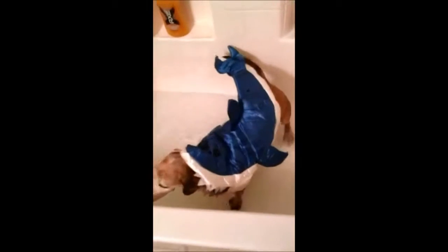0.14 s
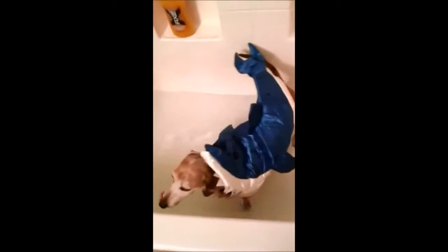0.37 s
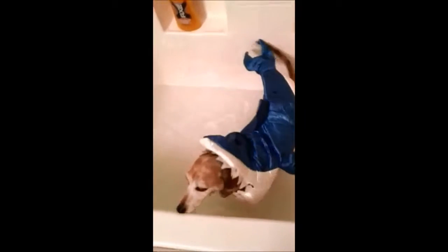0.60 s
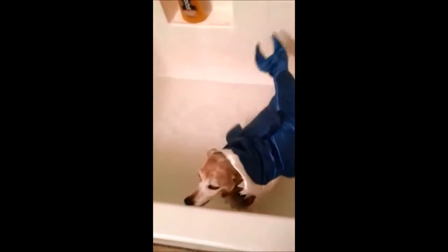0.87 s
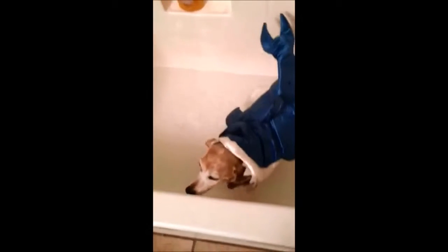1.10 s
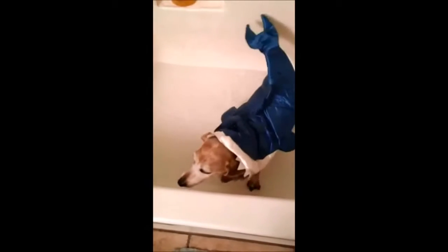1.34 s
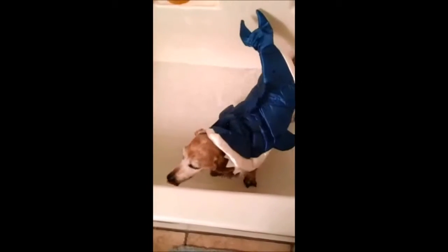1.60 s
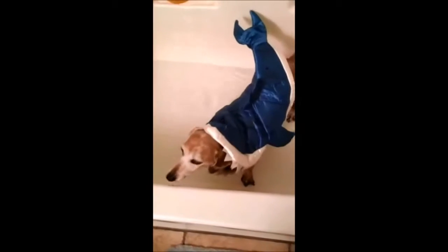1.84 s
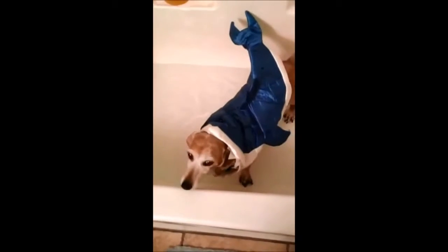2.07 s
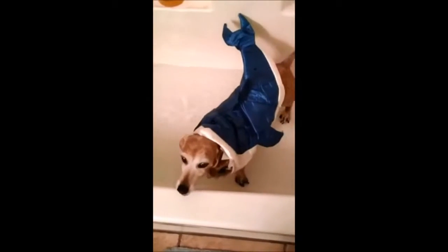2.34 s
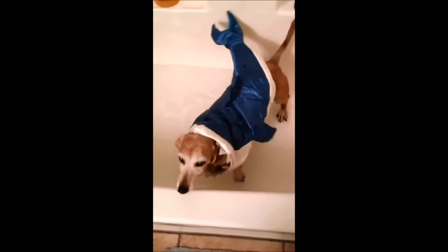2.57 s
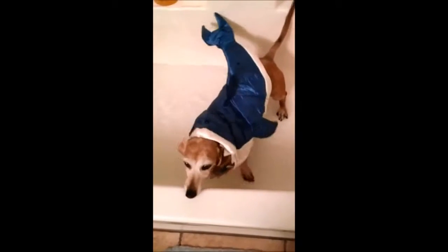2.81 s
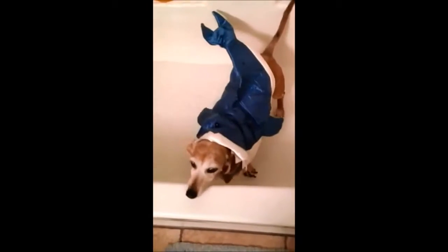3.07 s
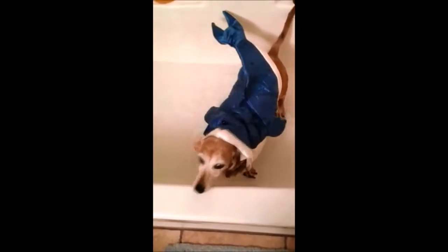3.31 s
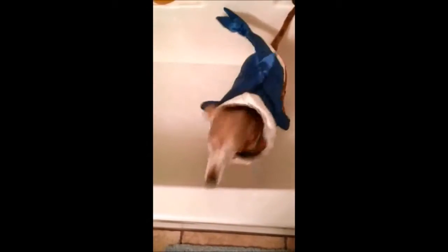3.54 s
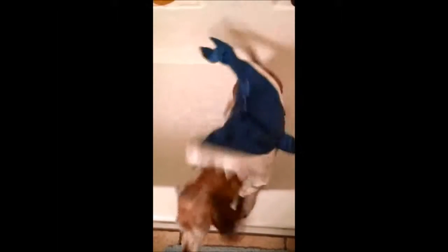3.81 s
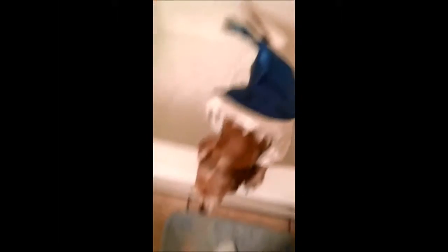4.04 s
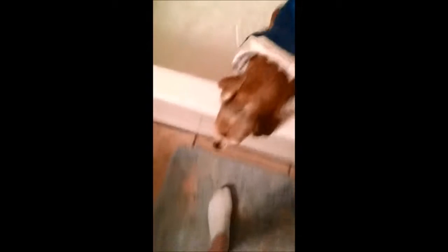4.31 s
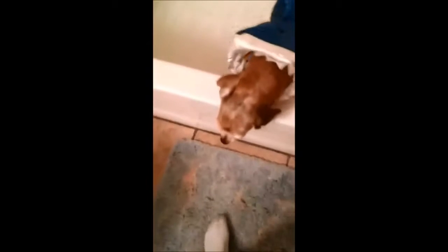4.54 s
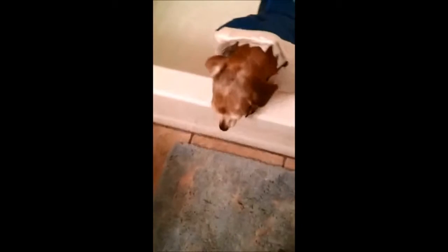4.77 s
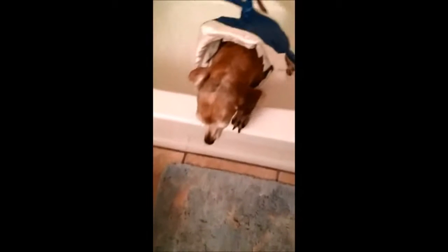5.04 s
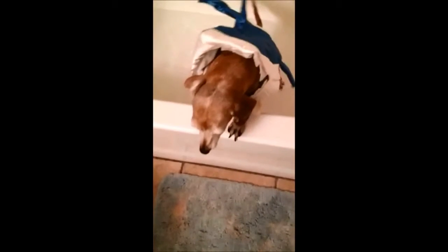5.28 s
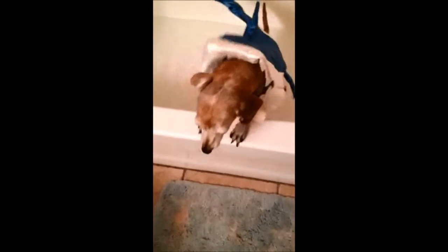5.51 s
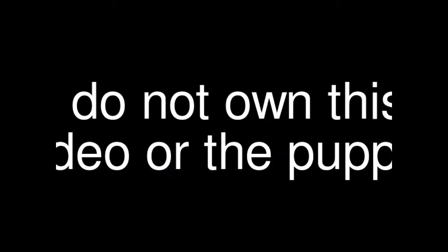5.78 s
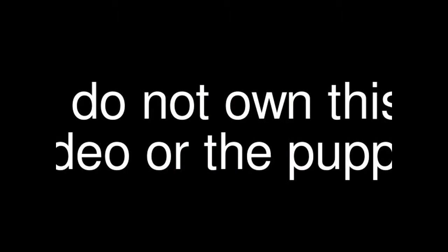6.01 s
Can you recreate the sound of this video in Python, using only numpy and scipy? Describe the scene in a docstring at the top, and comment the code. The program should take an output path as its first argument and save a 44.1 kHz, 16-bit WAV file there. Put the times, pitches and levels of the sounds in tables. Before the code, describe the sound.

In a small tiled bathroom, a dog paddles in a tub with a little water. Quick claw ticks and plinking bubbles come first, then dull thumps and short skids, a calmer stretch with faint sniffs, and a sudden very loud double clatter with a deep hollow boom and splash as it lunges for the rim. Light scratches and drips follow until the sound cuts dead. Close handheld microphone, thin bass.

```python
"""In a hard tiled bathroom, a small dog paddles and scrabbles in a tub holding a little water.
Claws and paws skid as bursts of tiny slips; the dog's weight thumps the ringing modes of the tub.
Trapped air plops as dying sines, water trickles as droplets over hiss, and the dog sniffs twice through
its resonant nose. The room spreads the sounds over a steady hush. All stops dead shortly before the end."""
import sys
import numpy as np
from scipy import signal
from scipy.fft import rfft, irfft
from scipy.io import wavfile

SR = 44100
rng = np.random.default_rng(int(sys.argv[2]) if len(sys.argv) > 2 else 0)


def dump(signal):
    """Clip the signal to [-1, 1] and save it as 16-bit WAV at the path in sys.argv[1]."""
    limited = np.clip(np.atleast_2d(signal).T, -1, 1)
    pcm = np.round(limited * 32767).astype(np.int16)
    wavfile.write(sys.argv[1], SR, pcm)


def elevation(decibels):
    """Turn decibel levels (scalar or array-like) into linear amplitude ratios."""
    levels = np.asarray(decibels, float)
    return 10 ** (levels / 20)


N = 270333   # length in samples

# Skids of claws and paws: t/s, level at 3.3 kHz/dB, then relative to it:
# level near 1.2 kHz/dB, level at 7 kHz/dB, level at 12 kHz/dB
SKIDS = [(0.2394, -48.5, -5, -4, -6), (0.2646, -35, -8, -20, -18), (0.2807, -37.5, 4, -7, -15),
         (0.3012, -32.5, 4, 1, -15), (0.318, -53, 3, -1, 6), (0.3458, -37.5, 4.5, 3, -12),
         (0.4931, -43.5, -4, -8, -7), (0.7246, -44.5, -10, -7, -13), (0.8938, -51.5, 6, 2.5, 0),
         (1.061, -30.5, -7, -3, -9), (1.067, -20.5, -2.5, -9, -10), (1.0711, -28.5, -3, 1.5, -6),
         (1.2541, -27, -5, -9, -16), (1.3008, -22, -1, -9.5, -17.5), (1.6407, -39.5, -11, 2.5, -7),
         (2.4475, -42.5, -2, -14, -18), (2.585, -42.5, -7, -1, -15), (2.6004, -41.5, -9, -1, -22),
         (2.617, -40.5, -20, -7, -18), (2.6532, -33, -11, 2.5, -9), (2.7401, -42, -15, 0, -11),
         (2.83, -56, 6, -1, 7), (2.8549, -28, -7, -12, -23), (2.8648, -38, 6, 7, -7.5),
         (3.1003, -54, -3, 0, -22), (3.1674, -39, -11, 1, -15), (3.1853, -33, -11.5, 4.5, -10),
         (3.236, -31, 1.5, -22, -15), (3.5074, -47, -4, -1, -14), (3.5562, -42.5, -5.5, -7.5, -6.5),
         (3.6047, -48, -2, -0.5, -1.5), (3.64, -34.5, -11, -15.5, -17), (3.743, -10.5, -3.5, -8, -3.5),
         (3.7509, -10.5, -1, -8, -2), (3.7772, -15, 1, 5, 1.5), (3.9125, -6.5, -6.5, 1, -3),
         (4.249, -51, -10, 4, -18), (4.285, -42.5, 7.5, -2, -7), (4.299, -34.5, -6, 4.5, -5.5),
         (4.4711, -38, -1.5, -12, -14), (4.5072, -36.5, 1, -14, -17), (4.5288, -40.5, 13, 5, -3),
         (4.5652, -42, 11, 5, -4), (4.6083, -43, 18.5, 2, -5), (4.708, -54, 10.5, 4, -2),
         (4.908, -41.5, -3, -7, -11), (5.0127, -49, -9, -2.5, -2.5), (5.3559, -32.5, -20.5, 3.5, -7),
         (5.3992, -34, -6.5, -11.5, -7), (5.664, -45.5, -2.5, -10, -13.5)]
# The dog's weight on the tub: t/s, boom of the floor/dB, knock of the sides/dB, knock of the rim/dB
THUMPS = [(0.308, -43.5, -55, -41.5), (0.349, -44, -72, -44), (0.812, -47.5, -51, -60),
          (0.906, -28.5, -35, -42.5), (0.935, -26, -46, -44), (1.31, -37.5, -44.5, -37.5),
          (2.148, -66, -48.5, -46.5), (2.252, -71, -72, -62), (2.392, -52, -53, -69),
          (2.495, -45.5, -47, -54), (2.659, -51, -47, -85), (2.861, -55, -65.5, -79),
          (3.246, -50, -51, -53), (3.526, -48, -49.5, -54.5), (3.598, -47, -54.5, -56.5),
          (3.755, -35.5, -36.5, -33), (3.913, -12, -28, -24), (3.957, -22, -37, -30.5),
          (4.079, -29.5, -49, -62), (4.308, -43.5, -48, -46.5), (4.399, -55, -44.5, -49.5),
          (4.532, -42, -56, -34.5), (4.598, -52, -48.5, -42), (5.169, -51.5, -66, -74),
          (5.402, -48, -51, -54), (5.432, -55, -52, -46)]
# Ways the tub shell rings (two of the floor, two of the sides, then the rim): f/Hz, level/dB, fall by 60 dB/s
TUB_MODES = [(124, -5.5, .15), (158.5, 0.5, 0.28), (234.2, -3.5, 0.17), (300.2, -2, 0.13),
             (376.6, -2.5, 0.11), (432, -1.5, 0.13), (550, -5.5, 0.058), (739, -11.5, 0.11),
             (850, -8.5, 0.077)]
# Air trapped by paws and drops, low plops to small plinks: t/s, starting level/dB, f/Hz, fall by 60 dB/s
BUBBLES = [(0.238, -36.5, 2440, 0.0076), (0.256, -38, 738, 0.023), (0.2655, -31, 2630, .007),
           (0.2796, -23.5, 6300, 0.0033), (0.282, -23, 820, 0.01), (0.296, -26, 6950, .005),
           (0.3015, -14.5, 2410, .005), (0.322, -22, 1450, 0.017), (0.3455, -19.5, 3230, .005),
           (0.343, -28, 6440, .005), (0.349, -34, 1570, .02), (0.386, -30, 2040, 0.0079),
           (0.434, -44, 1380, .02), (0.4925, -29, 2430, 0.0038), (0.508, -33.5, 2520, 0.0062),
           (0.669, -37.5, 9600, 0.0044), (1.325, -16.5, 584, 0.019), (1.344, -28.5, 688, 0.023),
           (1.68, -26, 1690, 0.0041), (1.686, -35.5, 1587, 0.04), (2.449, -23, 885, 0.025),
           (2.4616, -39, 4730, 0.0058), (2.475, -33.5, 1270, 0.017), (2.49, -40.5, 1470, 0.017),
           (2.609, -42, 1040, 0.042), (2.615, -29.5, 2760, 0.0074), (3.1381, -29, 4400, 0.0024),
           (3.234, -23, 1563, 0.011), (3.236, -24.5, 3450, 0.011), (3.5798, -34.5, 4420, 0.007),
           (3.6418, -33, 2800, 0.0073), (3.7473, 0.5, 2560, 0.0035), (3.8988, -4.5, 2200, 0.0033),
           (3.911, -1.5, 6960, 0.0034), (3.913, -5, 2160, 0.012), (3.9214, -10, 7300, .0035),
           (4.074, -26.5, 1615, 0.02), (4.29, -43, 662, 0.086), (4.3947, -36.5, 5040, .012),
           (4.4727, -17.5, 7000, 0.0016), (4.5076, -23.5, 3670, 0.007), (4.514, -27, 948, 0.033),
           (4.5294, -21, 4000, 0.007), (4.544, -29.5, 996, .022), (4.604, -24.5, 1190, 0.024),
           (4.608, -29, 1620, 0.023), (4.7092, -35, 5520, .009), (5.014, -33.5, 8200, .003),
           (5.1386, -38, 10340, 0.003), (5.1689, -39.5, 14700, .004), (5.44, -44, 840, 0.028),
           (5.6326, -28.5, 5610, .0015)]
# Restless water between splashes: t/s, trickle level/dB, push of the slosh on the shell/dB
RESTLESS_WATER = [(0.0, -73, -120), (0.3, -77, -100), (0.5, -63.5, -112), (0.95, -62.5, -100),
                  (1.3, -67, -108), (1.62, -68.5, -97), (1.95, -75.5, -112), (2.4, -72.5, -108),
                  (2.82, -66, -99.5), (3.15, -75, -108), (3.57, -70, -102), (3.8, -52, -97),
                  (4.14, -59.5, -108), (4.75, -62.5, -103), (5.12, -76.5, -130), (5.5, -67, -102)]
# Splashes thrown up by a paw: t/s, spray level/dB, push of the slosh/dB, time to swell/s
SPLASHES = [(0.26, -58, -97.5, 0.062), (1.07, -55, -90, 0.029), (2.48, -86, -96, 0.052),
            (2.62, -73, -98, 0.02), (3.65, -57, -93, 0.066), (3.905, -28.5, -73.5, 0.025),
            (4.3, -59, -100, 0.036), (4.53, -50, -88.5, 0.044)]
# Tone colour of the trickle: f/Hz, level per Hz/dB
TRICKLE_COLOUR = [(290, -44), (500, -3.5), (545, -10.5), (2980, -12), (5800, -13.5), (13100, -20),
                  (15300, -18), (16000, -30)]
# Resonances of the dog's nose: f/Hz, width/Hz, level/dB
NOSE = [(4730, 730, -1), (7760, 1000, 2), (9000, 600, -11), (10800, 600, -22)]
# Sniffs: t of the peak/s, level/dB
SNIFFS = [(2.187, -67), (2.456, -70)]
# How long the room's echo lasts: f/Hz, fall by 60 dB/s
ROOM_T60 = [(125, 1), (500, 0.46), (1800, 0.33), (5000, 0.33), (13000, 0.25)]
# Tone colour of the room's echo: f/Hz, relative level/dB
ROOM_COLOUR = [(125, -1.5), (500, 4), (1800, 0.38), (5000, -1.5), (13000, -2)]
# Tone colour of the steady hush: f/Hz, level per Hz/dB
HUSH_COLOUR = [(15, -60), (25, -27.5), (64, -17.5), (105, -3.5), (161, 4.5), (285, -10.5), (405, -5),
               (531, -14), (9840, -26.5), (14400, -35.5), (16000, -40.5)]


def rms_one(x):
    """Scale to an rms (average strength) of 1."""
    return x / np.sqrt(np.mean(x ** 2) + 1e-20)


def in_time(rows):
    """Draw straight lines between the rows of a time table, giving one value a sample for each column."""
    times, *columns = np.transpose(rows)
    return [np.interp(np.arange(N) / SR, times, column) for column in columns]


def at_hz(points, hz):
    """Read a frequency table on a logarithmic axis, as the ear hears pitch."""
    table_hz, values = np.transpose(points)
    return np.interp(np.log(np.maximum(hz, 1)), np.log(table_hz), values)


def coloured(x, points):
    """Filter a sound with a curve of (Hz, dB) points."""
    gain = elevation(at_hz(points, np.fft.rfftfreq(len(x), 1 / SR)))
    return irfft(rfft(x) * gain, len(x))


def ring(x, hz, t60):
    """A resonance: a unit click sets off a sine starting near height 1 and falling 60 dB in t60 seconds."""
    decay = elevation(-60 / (max(t60, 0.001) * SR))
    turn = 2 * np.pi * hz / SR
    return signal.lfilter([0, np.sin(turn)], [1, -2 * decay * np.cos(turn), decay ** 2], x + 1e-18)


def add(out, s, piece):
    """Mix a piece in, starting at s seconds."""
    at = round(s * SR)
    out[at:at + len(piece)] += piece[:N - at]


def grains(per_s, spread_db, size):
    """Scatter random clicks of uneven size and either sign."""
    sizes = elevation(spread_db * np.minimum(rng.exponential(1, size), 5)) * rng.choice([-1, 1], size)
    return sizes * (rng.random(size) < per_s / SR)


def swell(t, length):
    """Rise to 1 after a length of time, then die away."""
    u = np.maximum(t / max(length, 0.0003), 0)
    return u * np.exp(1 - u)


def skids():
    """Each skid is a dense burst of slips that swells and dies, in a colour of its own."""
    swell_s = 0.004
    slope_db = 3.5   # rise from 750 to 1500 Hz
    low_edge_db, top_edge_db = 21, 6.5   # falls towards 400 Hz and 16 kHz
    out = np.zeros(N)
    shape = swell(np.arange(4096) / SR, swell_s)
    for s, level_db, low_db, high_db, top_db in SKIDS:
        slips = rfft(grains(9000, 3.2, size=len(shape)) * shape)
        # Even out the spectrum: so many slips favour no pitch
        even = irfft(slips / np.sqrt(np.abs(slips) + 1e-9)) * shape ** 0.043
        burst = rms_one(even) * np.sqrt(np.mean(shape ** 2))
        colour = [(400, low_db - low_edge_db), (750, low_db - slope_db / 2), (1500, low_db + slope_db / 2),
                  (3300, 0), (7000, high_db), (12000, top_db), (16000, top_db - top_edge_db)]
        add(out, s - 0.6 * swell_s, elevation(level_db) * coloured(burst, colour))
    return out


def tub(push):
    """Paws and sloshing water ring the shell: the floor booms (row 0), the sides and rim knock (row 1)."""
    settle_s = 0.0063   # build-up time of the second floor mode
    hard_db = -29   # blows with a rim knock under this are gentle
    gentle_dull = 0.4   # share of that shortfall lost per octave in the high modes
    out, t = np.zeros((2, N)), np.arange(SR // 2) / SR
    uneven_db = rng.normal(0, 2.5, (len(THUMPS), len(TUB_MODES)))
    slosh = push * rng.standard_normal(N)
    for k, (hz, level_db, t60) in enumerate(TUB_MODES):
        row = out[int(k >= 2)]
        row += elevation(level_db) * ring(slosh, hz, t60)
        mode = elevation(level_db - 60 * t / t60) * np.sin(2 * np.pi * hz * t)
        build = 1 - np.exp(-t * hz / TUB_MODES[1][0] / settle_s)   # low modes build up more slowly
        octaves_up = max(np.log2(hz / TUB_MODES[5][0]), 0)
        for (s, boom_db, side_db, rim_db), own_db in zip(THUMPS, uneven_db[:, k]):
            if k < 2:
                part_db = boom_db
            else:
                part_db = own_db + (side_db if k < 4 else rim_db)
            part_db -= gentle_dull * max(hard_db - rim_db, 0) * octaves_up   # gentle blows are duller
            add(row, s, elevation(part_db) * build * mode)
    return out


def bubbles():
    """A pocket of air rings as a dying sine whose pitch creeps up as it surfaces."""
    rise = 0.05   # the pitch gains twice this share by the time the sine has fallen 60 dB
    out, t = np.zeros(N), np.arange(6000) / SR
    for s, level_db, hz, t60 in BUBBLES:
        cycles = hz * (t + rise * t ** 2 / t60)
        onset = 1 - np.exp(-t * hz / 1.2)   # builds up over about one cycle
        add(out, s, elevation(level_db - 60 * t / t60) * onset * np.sin(2 * np.pi * cycles))
    return out


def water():
    """Strength of the trickle and of the slosh: a restless ground plus the swell of each splash."""
    slosh_lag_s = 0.032   # the heavy water follows the spray
    t = np.arange(N) / SR
    spray, slosh = elevation(np.array(in_time(RESTLESS_WATER)))
    for s, spray_db, slosh_db, length in SPLASHES:
        spray = spray + elevation(spray_db) * swell(t - s, length) ** 2
        slosh = slosh + elevation(slosh_db) * swell(t - s - slosh_lag_s, length) ** 2
    return spray, slosh


def trickle(level):
    """Many tiny droplets, each ringing for a few cycles, over a fine hiss."""
    clicks = grains(1500, 0.97, size=N)
    dealt = rng.integers(0, 16, N)   # deals each click to one of 16 pitches
    drops = np.zeros(N)
    for k, hz in enumerate(np.geomspace(700, 14000, 16)):
        drops += ring(clicks * (dealt == k), hz, 12 / hz)
    drops = rms_one(coloured(drops, [(700, -11.5), (14000, 12.0)]))
    mixed = drops + elevation(-2) * rng.standard_normal(N)
    return level * rms_one(coloured(mixed, [(200, -37.5)] + TRICKLE_COLOUR))


def sniff():
    """Air hisses through the narrow resonances of the nose, each passed twice."""
    rise_db_per_s, fall_db_per_s = 386, 270
    air, t = rng.standard_normal(N), np.arange(N) / SR
    hiss, strength = np.zeros(N), np.zeros(N)
    for hz, width, level_db in NOSE:
        t60 = np.log(1000) / (np.pi * width)   # a narrow resonance rings longer
        hiss += elevation(level_db) * rms_one(ring(ring(air, hz, t60), hz, t60))
    for s, level_db in SNIFFS:
        strength += elevation(level_db + np.minimum(rise_db_per_s * (t - s), fall_db_per_s * (s - t)))
    return hiss * strength


def bathroom(x):
    """Dense reflections build up within milliseconds and die band by band."""
    echo_db, build_s = 2.5, 0.0014
    t, tail = np.arange(SR) / SR, np.zeros(SR)
    edges = 45 * 2 ** np.arange(0, 9, 0.5)   # half-octave bands, in Hz
    for low, high in zip(edges, edges[1:]):
        hz = np.sqrt(low * high)
        band_filter = signal.butter(2, [low, high], "band", fs=SR, output="sos")
        band = signal.sosfilt(band_filter, rng.standard_normal(SR))
        t60 = at_hz(ROOM_T60, hz)
        fall = elevation(at_hz(ROOM_COLOUR, hz) - 60 * t / t60)
        tail += band * fall / np.sqrt(t60 * SR / np.log(1e6))   # a long echo gets no extra energy
    tail *= 1 - np.exp(-t / build_s)
    return x + elevation(echo_db) * signal.fftconvolve(x, tail)[:N]


def hush():
    """A steady background of coloured noise."""
    return elevation(-64) * rms_one(coloured(rng.standard_normal(N), HUSH_COLOUR))


def scene():
    """The room spreads everything in the tub but the deep boom; a steady hush lies under it."""
    spray, slosh = water()
    boom, knock = tub(slosh)
    near = skids() + knock + bubbles() + trickle(spray) + sniff()
    return (bathroom(near) + boom + hush())[None]


def band_limit(x):
    """A steep low-pass at the top of the band."""
    return signal.sosfilt(signal.butter(12, 16630, fs=SR, output="sos"), x)


def record(dry):
    """The small microphone drops the deep bass, peaks are rounded, the top is cut, the sound stops dead."""
    low_cut = signal.butter(3, 101, "high", fs=SR, output="sos")
    top_cut = signal.cheby2(12, 60, 16500, fs=SR, output="sos")
    heard = signal.sosfilt(low_cut, dry)
    rounded = 1.08 * np.tanh(heard / 1.08)
    heard = signal.sosfilt(top_cut, rounded)
    stop_s, fade_s = 5.684, 0.0011   # silence starts at stop_s, after a very short fade
    stop = np.clip((stop_s - np.arange(N) / SR) / fade_s, 0, 1)
    return band_limit(heard * stop)


dry = scene()
out = record(dry)
dump(out)
```